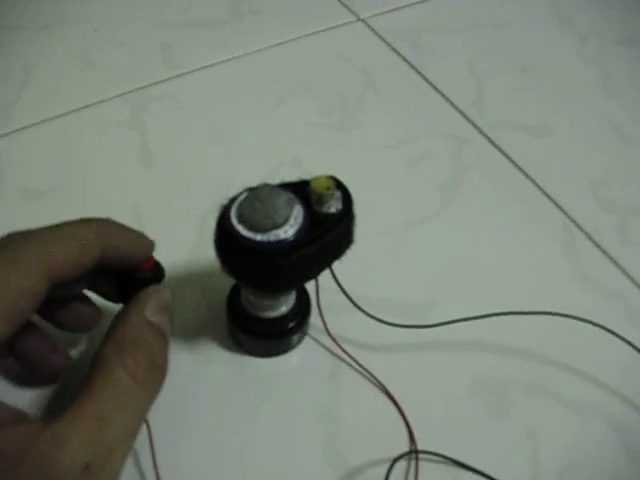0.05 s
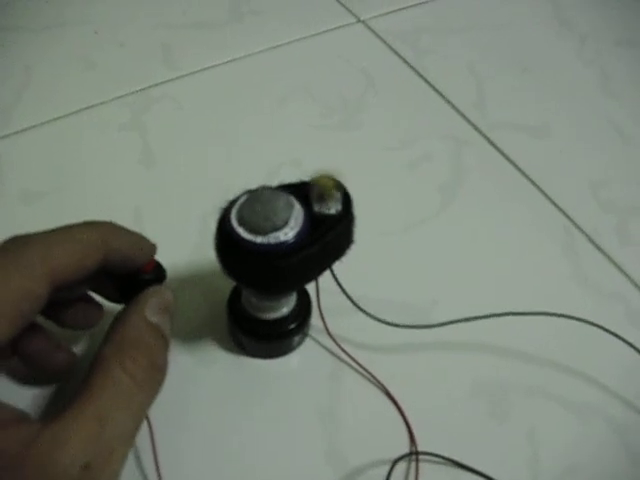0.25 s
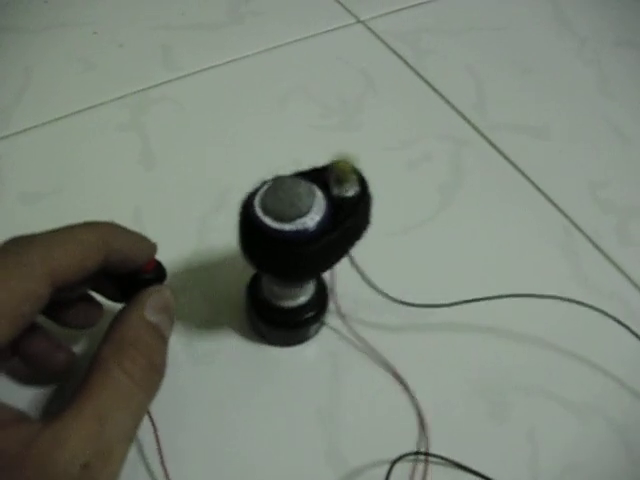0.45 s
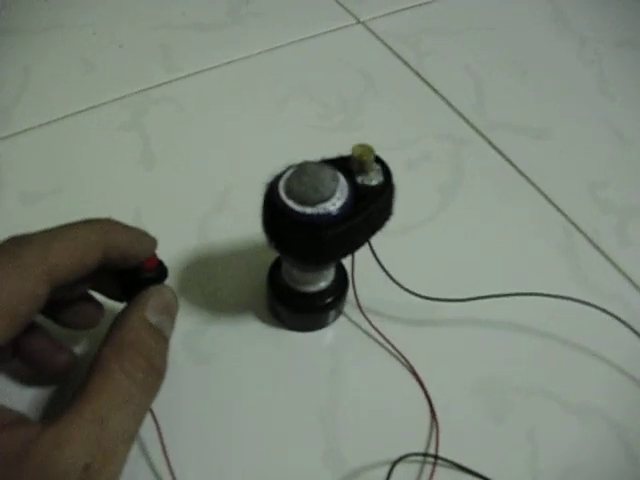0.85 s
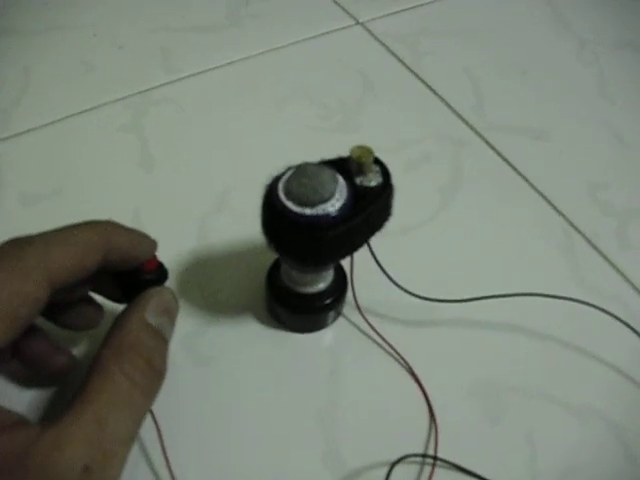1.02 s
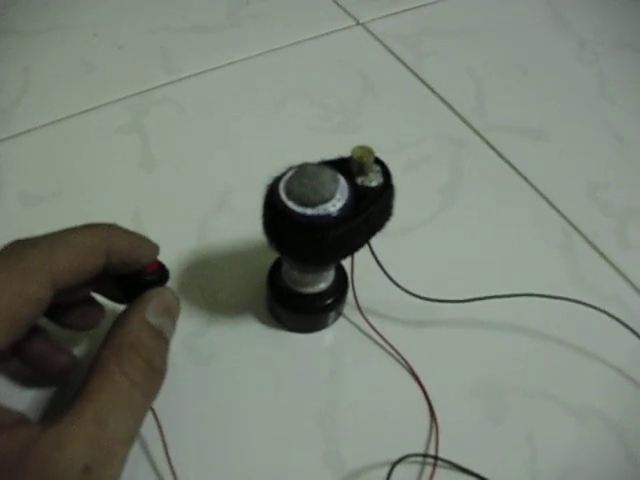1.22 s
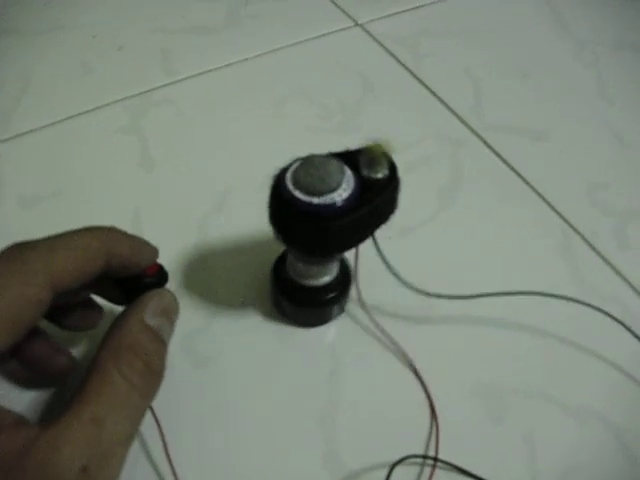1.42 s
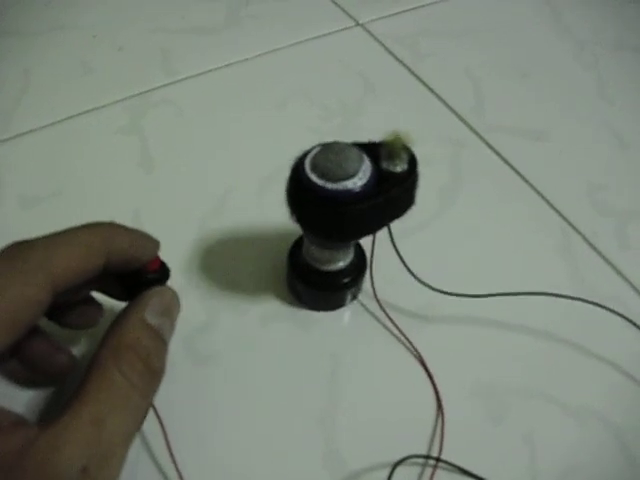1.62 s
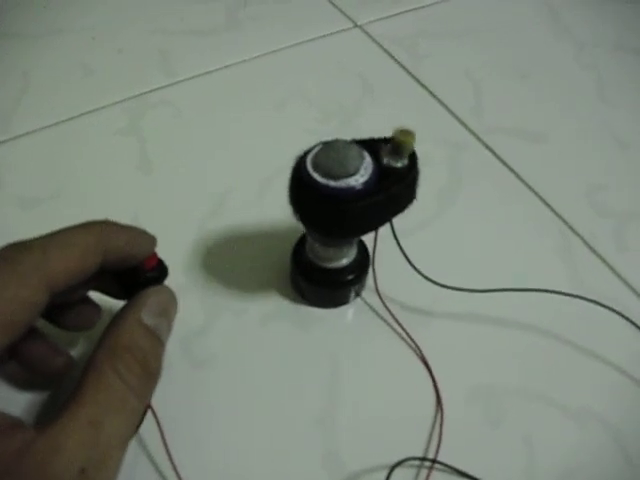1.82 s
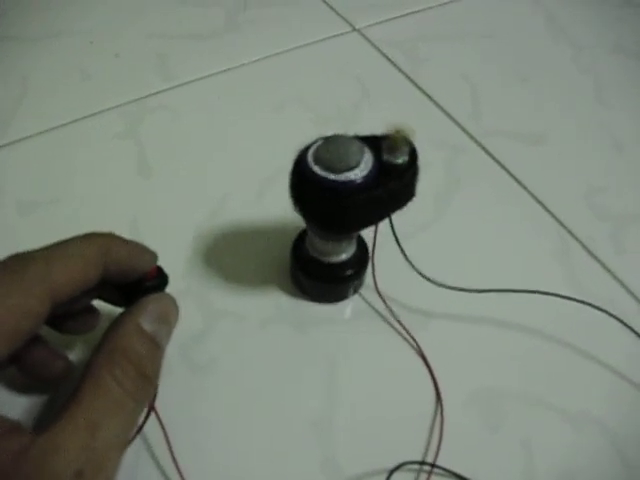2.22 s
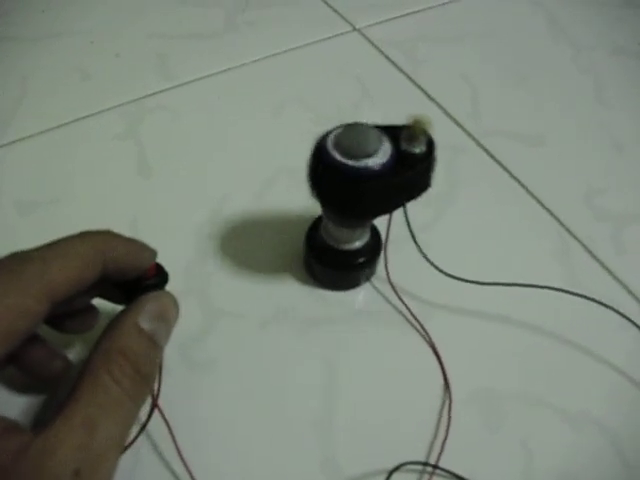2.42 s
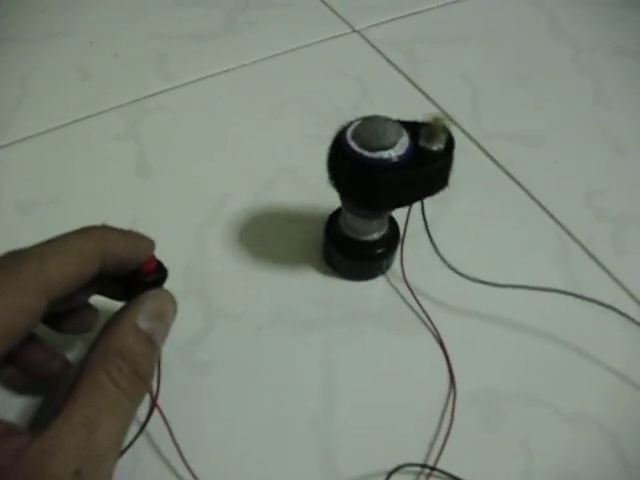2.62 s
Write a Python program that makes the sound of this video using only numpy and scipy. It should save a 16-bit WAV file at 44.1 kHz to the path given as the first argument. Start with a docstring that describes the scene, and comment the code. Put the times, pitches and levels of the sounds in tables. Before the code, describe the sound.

Three quick bursts of clicking chatter from a small motor shaking its plastic stand on tile.

```python
"""A low, steady room rumble is heard first; then a small motor runs three times on a plastic stand.
Its off-centre weight makes the stand chatter on floor tiles. Each impact of the foot gives a hard click
and excites damped modes: a short bright ring of the foot, a duller knock of the housing and, on real
hops, a low thud. The motor whirs faintly and coasts down after each run; the hard walls reverberate."""
import sys
import numpy as np
from scipy import signal
from scipy.fft import rfft, irfft, next_fast_len
from scipy.io import wavfile

SR = 44100
rng = np.random.default_rng(int(sys.argv[2]) if len(sys.argv) > 2 else 0)


def master(y):
    """Save y as 16-bit WAV."""
    cut = np.clip(np.atleast_2d(y).T, -1, 1)
    pcm = np.round(cut * 32767)  # scale
    wavfile.write(sys.argv[1], SR, pcm.astype(np.int16))


N = 121275

# Spectrum of the room's rumble and hiss. Each row: frequency in Hz, relative density in dB.
RUMBLE_SPECTRUM = [(12, -25), (20, -0.5), (101, -5), (146, -7.5), (182, -9), (293, -13), (485, -17),
                   (607, -19.5), (2260, -32), (8180, -40), (16000, -42.5)]
# Runs of the motor. Each row: switch-on in seconds, switch-off in seconds, whirr level in dB.
MOTOR_RUNS = [(0.178, 0.546, -56.5), (1.227, 1.54, -54.5), (2.01, 2.478, -53.5)]
# Spectrum of the whirr. Each row: frequency in Hz, relative density in dB.
WHIRR_SPECTRUM = [(200, -16), (1000, 3.5), (1550, -2.5), (2250, -2.5), (3400, -2.5), (4400, -5.5),
                  (7000, -8.5), (15000, -26)]
# Landings of the foot on the tile. Each row: start in seconds, ring level in dB,
# ring tilt in dB per octave, knock level in dB, click level in dB.
HOPS = [(0.1965, -45.0, -28.0, -42.0, -45.0), (0.2161, -27.0, -10.0, -40.0, -35.0),
        (0.2312, -27.0, -4.0, -38.0, -29.0), (0.248, -32.0, -8.0, -28.0, -27.0),
        (0.2627, -19.0, 11.0, -34.0, -26.0), (0.2722, -17.0, 30.0, -43.0, -29.0),
        (0.2864, -27.0, 10.0, -52.0, -38.0), (0.3024, -23.0, 14.0, -43.0, -39.0),
        (0.3116, -24.0, 19.0, -43.0, -35.0), (0.3213, -22.0, 24.0, -46.0, -34.0),
        (0.3301, -20.0, 30.0, -45.0, -28.0), (0.3581, -33.0, -5.0, -46.0, -37.0),
        (0.3672, -28.0, 3.0, -51.0, -32.0), (0.3776, -26.0, -1.0, -39.0, -33.0),
        (0.4134, -20.0, 7.0, -38.0, -27.0), (0.4476, -22.0, 26.0, -47.0, -36.0),
        (0.4659, -30.0, -5.0, -51.0, -44.0), (0.4836, -26.0, 6.0, -46.0, -34.0),
        (0.4989, -24.0, 3.0, -45.0, -30.0), (0.5156, -28.0, -12.0, -42.0, -32.0),
        (0.5278, -30.0, -18.0, -42.0, -41.0), (0.5364, -38.0, 5.0, -39.0, -38.0),
        (0.5523, -44.0, 2.0, -35.0, -42.0), (1.2442, -49.0, -28.0, -43.0, -40.0),
        (1.2576, -35.0, 16.0, -40.0, -43.0), (1.2707, -38.0, -28.0, -46.0, -46.0),
        (1.2813, -30.0, 7.0, -38.0, -36.0), (1.2872, -35.0, 2.0, -46.0, -35.0),
        (1.3003, -32.0, 14.0, -42.0, -36.0), (1.3186, -24.0, 6.0, -40.0, -35.0),
        (1.3388, -20.0, 22.0, -43.0, -33.0), (1.3612, -29.0, 7.0, -35.0, -37.0),
        (1.3796, -34.0, -28.0, -34.0, -35.0), (1.394, -41.0, -28.0, -39.0, -41.0),
        (1.408, -26.0, 11.0, -42.0, -39.0), (1.4207, -36.0, -8.0, -47.0, -50.0),
        (1.4367, -33.0, -5.0, -42.0, -43.0), (1.4441, -33.0, -24.0, -39.0, -35.0),
        (1.4565, -33.0, -26.0, -38.0, -38.0), (1.4747, -29.0, -19.0, -43.0, -35.0),
        (1.4892, -30.0, -6.0, -40.0, -36.0), (1.5192, -30.0, -21.0, -33.0, -33.0),
        (1.5311, -38.0, -1.0, -37.0, -39.0), (1.5486, -33.0, -25.0, -38.0, -37.0),
        (2.0525, -35.0, -5.0, -45.0, -43.0), (2.082, -20.0, 9.0, -38.0, -28.0),
        (2.0992, -25.0, 1.0, -43.0, -32.0), (2.1166, -33.0, 14.0, -38.0, -48.0),
        (2.1338, -25.0, 17.0, -44.0, -42.0), (2.1405, -34.0, 1.0, -46.0, -45.0),
        (2.1563, -29.0, 11.0, -34.0, -34.0), (2.1743, -30.0, -4.0, -32.0, -34.0),
        (2.1877, -22.0, 15.0, -30.0, -28.0), (2.2078, -21.0, -3.0, -43.0, -31.0),
        (2.2275, -30.0, 0.0, -37.0, -35.0), (2.2337, -34.0, -4.0, -40.0, -37.0),
        (2.2471, -28.0, 0.0, -35.0, -31.0), (2.2754, -33.0, 15.0, -40.0, -40.0),
        (2.285, -30.0, -1.0, -45.0, -39.0), (2.2915, -31.0, 19.0, -35.0, -33.0),
        (2.3057, -30.0, -20.0, -38.0, -37.0), (2.3199, -25.0, -11.0, -30.0, -26.0),
        (2.3392, -18.0, 12.0, -37.0, -24.0), (2.3613, -17.0, 12.0, -31.0, -26.0),
        (2.3817, -27.0, -2.0, -41.0, -35.0), (2.401, -32.0, 3.0, -36.0, -37.0),
        (2.4067, -36.0, -10.0, -43.0, -43.0), (2.42, -42.0, 0.0, -38.0, -48.0),
        (2.426, -33.0, -28.0, -39.0, -40.0), (2.4372, -27.0, -7.0, -38.0, -35.0),
        (2.4505, -32.0, -19.0, -46.0, -35.0), (2.4615, -39.0, -2.0, -36.0, -41.0),
        (2.476, -31.0, -28.0, -38.0, -38.0)]
# Modes of the foot. Each row: frequency in Hz in the first run, frequency in Hz once the stand
# has walked on, relative level in dB, time to decay by 60 dB (T60) in seconds.
FOOT_MODES = [(4040, 4000, -6.5, .011), (4665, 4582, -1, .0108), (5410, 5200, -3.3, .0072),
              (6400, 6250, -17, .0035)]
# Modes of the hollow housing. Each row: frequency in Hz, relative level in dB, T60 in seconds.
HOUSING_MODES = [(2253, 0.5, 0.0091), (3043, 1.4, 0.0091)]
# Spectrum of the contact click. Each row: frequency in Hz, relative density in dB.
CLICK_SPECTRUM = [(1500, -11.5), (4200, -5), (5800, 2.5), (6400, 4), (7700, -5.5), (9400, 7), (10900, -4),
                  (12500, 2.5), (14000, -2), (16000, -13.5)]
# Low modes of the stand. Each row: frequency in Hz, relative level in dB, T60 in seconds.
STAND_MODES = [(350, -7.5, 0.0062), (1005, 1, 0.0064)]
# Reverberation time of the room. Each row: frequency in Hz, T60 in seconds.
ROOM_DECAY = [(4500, 0.33), (13000, 0.25)]
# Light rocking between hops and while the motor turns slowly.
# Each row: start in seconds, end in seconds, mean ring level in dB.
ROCKING_SPELLS = [(0.388, .408, -40), (1.56, 1.682, -55), (2.011, 2.07, -49.5), (2.487, 2.63, -49)]


def amp(db):
    """Amplitude grows tenfold for every 20 dB."""
    return 10 ** (np.asarray(db) / 20)


def unit(x):
    """Normalisation to an rms of 1."""
    return x / np.sqrt(np.mean(x ** 2) + 1e-20)


def along(points, hz):
    """Interpolation of (Hz, value) points on a logarithmic frequency axis."""
    frequencies, values = np.transpose(points)
    return np.interp(np.log(hz + 1), np.log(frequencies + 1), values)


def fade(t, t60):
    """Exponential damping: the level falls 60 dB in t60 seconds."""
    return np.exp(-np.log(1000) * t / t60)


def filtered(x, response):
    """Linear filtering multiplies the spectrum by a frequency response."""
    size = next_fast_len(N + SR // 2)
    return irfft(rfft(x, size) * response(np.fft.rfftfreq(size, 1 / SR)), size)[:N]


def noise(spectrum):
    """Spectral shaping turns white noise into coloured noise, here of rms 1."""
    return unit(filtered(rng.standard_normal(N), lambda hz: amp(along(spectrum, hz))))


def coloured(x, spectrum, size=4096):
    """A minimum-phase filter, made by folding the cepstrum, colours a short sound causally."""
    cepstrum = irfft(np.log(amp(along(spectrum, np.fft.rfftfreq(size, 1 / SR)))))
    cepstrum[1:size // 2] *= 2
    cepstrum[size // 2 + 1:] = 0
    return irfft(rfft(x, size) * np.exp(rfft(cepstrum)))[:len(x)]


def at_level(x, db, window_s=.001):
    """Equal energy: a transient gets the energy of a steady sound at db lasting window_s."""
    return amp(db) * x * np.sqrt(window_s * SR / np.sum(x ** 2))


def add(track, start_s, x):
    """Superposition: x adds to the track from start_s on."""
    part = track[round(start_s * SR):][:len(x)]
    part += x[:len(part)]


def room_rumble(rumble_db=-51.5, hum_db=-72, hum_hz=304.7, hum_width_hz=4.7):
    """Broadband noise gives the rumble; a narrow band beats within itself as a wavering hum."""
    hum = filtered(rng.standard_normal(N), lambda hz: np.exp(-((hz - hum_hz) / hum_width_hz) ** 2))
    return amp(rumble_db) * noise(RUMBLE_SPECTRUM) + amp(hum_db) * unit(hum)


def motor_whirr(turn_hz=54.36, swing_db=9, spin_up_s=.018, coast_db_per_s=110):
    """Amplitude modulation: noise pulses once a turn, swelling at spin-up and fading as the motor coasts."""
    t = np.arange(N) / SR
    envelope = np.zeros(N)
    for on, off, db in MOTOR_RUNS:
        spin_up = np.clip((t - on) / spin_up_s, 0, 1)
        envelope += spin_up * amp(db - coast_db_per_s * np.maximum(t - off, 0))
    pulsing = amp(swing_db * np.sin(2 * np.pi * turn_hz * t))
    return envelope * unit(noise(WHIRR_SPECTRUM) * pulsing)


def foot_ring(t, start_s, tilt_db, walked_s=1.0, detune=.007, attack_s=.0002, in_phase_s=.00068):
    """Close modes of the foot beat; the angle of landing favours the higher or the lower ones."""
    first_hz, later_hz, db, t60 = np.transpose(FOOT_MODES)[:, :, None]
    hz = (first_hz if start_s < walked_s else later_hz) * (1 + detune * rng.standard_normal(db.shape))
    db = db + tilt_db * np.log2(hz / hz[1])
    phase = 2 * np.pi * (hz * (t - in_phase_s) + rng.random())
    modes = amp(db) * fade(t, t60) * np.sin(phase)
    return modes.sum(0) * (1 - np.exp(-(t / attack_s) ** 2))


def struck_body(t, mode_table, detune=.02, scatter_db=2.5, attack_s=.00025):
    """Free vibration of a struck body is a sum of damped modes, a little different at each blow."""
    hz, db, t60 = np.transpose(mode_table)[:, :, None]
    hz = hz * (1 + detune * rng.standard_normal(hz.shape))
    db = db + scatter_db * rng.standard_normal(db.shape)
    modes = amp(db) * fade(t, t60) * np.sin(2 * np.pi * hz * t)
    return modes.sum(0) * (1 - np.exp(-t / attack_s))


def contact_click(t, rise_s=.0001, crack_t60_s=.0018, sizzle_t60_s=.011, sizzle_db=-13):
    """A brief, hard contact has a broad spectrum: a crack and a short sizzle of varying brightness."""
    decay = fade(t, crack_t60_s) + amp(sizzle_db) * fade(t, sizzle_t60_s)
    envelope = (1 - np.exp(-t / rise_s)) * decay
    tilt = 1.5 * rng.standard_normal()  # dB per octave
    top_hz = CLICK_SPECTRUM[-1][0]
    spectrum = [(hz, db + tilt * np.log2(hz / top_hz)) for hz, db in CLICK_SPECTRUM]
    return coloured(envelope * rng.standard_normal(len(t)), spectrum)


def stand_thud(t, start_s, knock_db, offset_db=-24.5, knock_share=.5, heavy_db=8, settle_s=.07):
    """Low modes grow with the blow: the thud follows the knock and is heavier just after switch-on."""
    running_s = min((start_s - on for on, _, _ in MOTOR_RUNS if start_s >= on), default=0)
    db = offset_db + knock_share * knock_db + heavy_db * np.exp(-running_s / settle_s)
    return at_level(struck_body(t, STAND_MODES), db)


def room_tail():
    """A diffuse field responds as decaying noise, here of energy 1; the treble dies first."""
    hz, t, spectra = signal.stft(rng.standard_normal(SR // 4), SR, nperseg=256)
    _, tail = signal.istft(spectra * fade(t, along(ROOM_DECAY, hz)[:, None]), SR, nperseg=256)
    return tail / np.linalg.norm(tail)


def chatter(taps, thuds, tap_s=.03, room_db=-16, room_delay_s=.005):
    """Impact excitation: each tap starts its sounds together, and convolution adds the room's answer."""
    track = np.zeros(N)
    t = np.arange(int(tap_s * SR)) / SR
    for start_s, ring_db, tilt_db, knock_db, click_db in taps:
        tap = at_level(foot_ring(t, start_s, tilt_db), ring_db)
        tap += at_level(struck_body(t, HOUSING_MODES), knock_db)
        tap += at_level(contact_click(t), click_db)
        if thuds:
            tap += stand_thud(t, start_s, knock_db)
        add(track, start_s, tap)
        add(track, start_s + room_delay_s, amp(room_db) * signal.fftconvolve(tap, room_tail()))
    return track


def rocking_taps(count=10, mean_gap_s=.018, scatter_db=1.5, knock_offset_db=-1.5, click_offset_db=-8.5):
    """Rocking without hopping makes weak, irregular impacts, listed in rows like those of HOPS."""
    taps = []
    for start_s, end_s, ring_db in ROCKING_SPELLS:
        gaps = mean_gap_s * (.5 + rng.random(count))
        times = start_s + np.cumsum(gaps) - gaps[0]
        levels = ring_db + scatter_db * rng.standard_normal(count)
        taps += [(time_s, db, 0, db + knock_offset_db, db + click_offset_db)
                 for time_s, db in zip(times, levels) if time_s < end_s]
    return taps


def scene():
    """The pressures of rumble, whirr, hops and rocking add at one close microphone."""
    pressure = room_rumble() + motor_whirr()
    pressure += chatter(HOPS, thuds=True)
    pressure += chatter(rocking_taps(), thuds=False)
    return pressure[None]


def record(dry):
    """Band limiting: an ideal low-pass filter removes the highest treble."""
    cutoff_hz = 16400
    return np.array([filtered(channel, lambda hz: hz < cutoff_hz) for channel in dry])


dry = scene()
out = record(dry)
master(out)
```